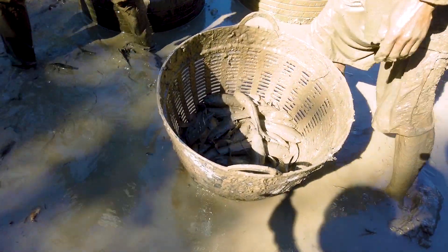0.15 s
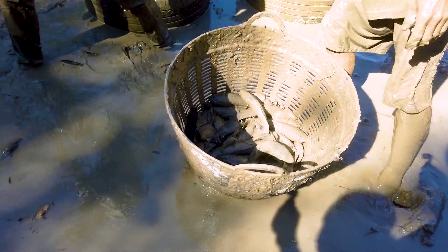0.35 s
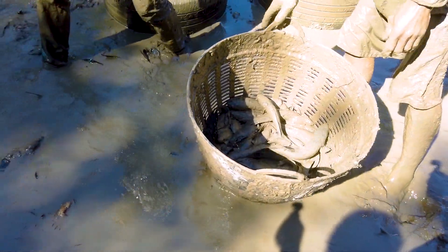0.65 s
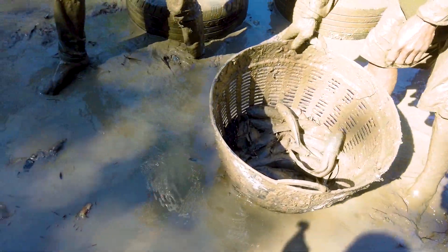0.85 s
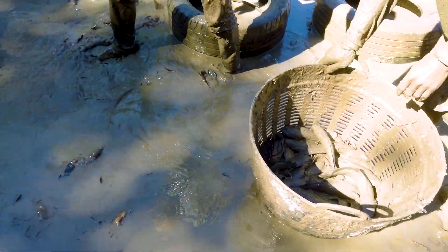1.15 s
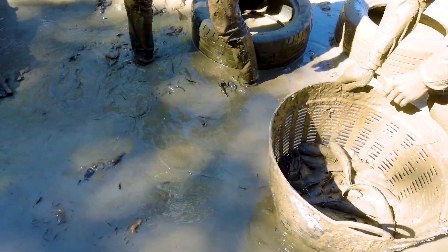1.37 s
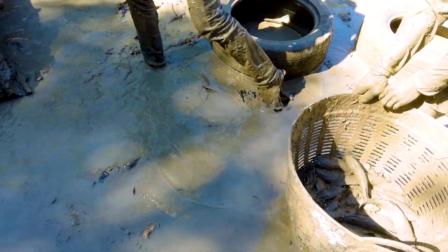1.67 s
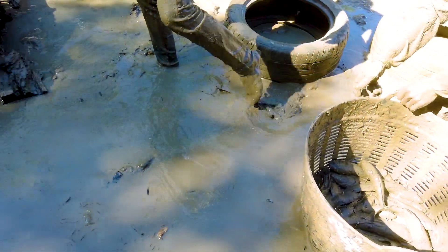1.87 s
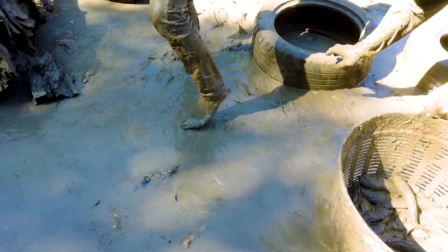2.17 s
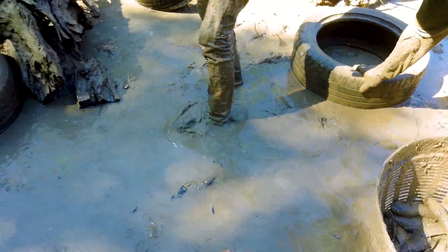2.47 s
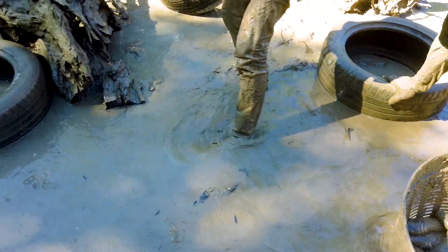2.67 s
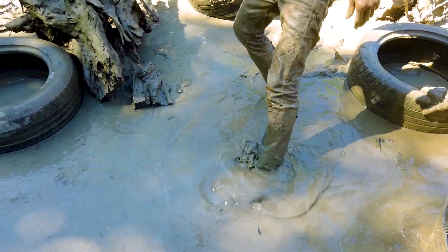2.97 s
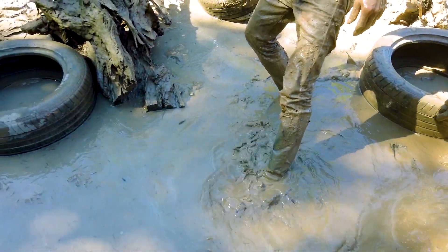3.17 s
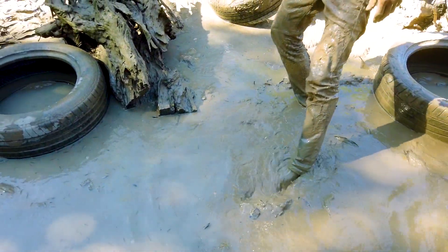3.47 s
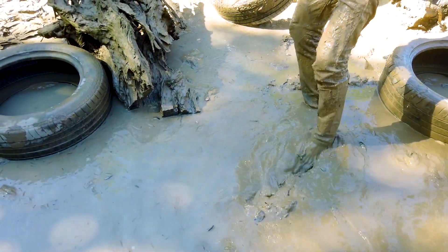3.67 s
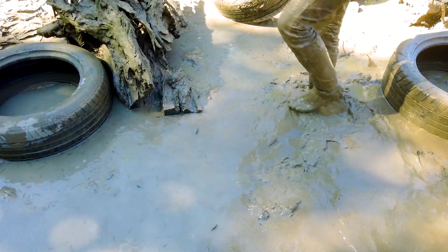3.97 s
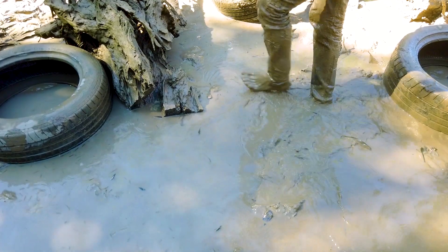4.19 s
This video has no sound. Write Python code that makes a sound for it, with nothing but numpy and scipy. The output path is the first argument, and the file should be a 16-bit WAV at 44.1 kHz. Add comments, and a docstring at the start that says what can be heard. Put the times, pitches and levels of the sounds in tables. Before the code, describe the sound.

Feet wade through wet mud and shallow water, squelching and sloshing with bubbly pops, while wind bumps the microphone.

```python
"""Bare feet wade through the soft mud and shallow water of a drained pond, a couple of metres away.
First a foot stirs the water, which churns and fizzes with bubbles, while a gust rumbles on the microphone.
From about 1 s the feet sink and pull free: air pockets pop, hollows gurgle and films of wet mud smack.
After a lull near 2 s the wading picks up, wind thumps the microphone around 3 s, and a last flurry of
pops comes near 4 s. All along, the banks scatter a short echo."""
import sys
import numpy as np
from scipy import signal
from scipy.fft import rfft, irfft, next_fast_len
from scipy.io import wavfile

SR = 44100
rng = np.random.default_rng(int(sys.argv[2]) if len(sys.argv) > 2 else 0)


def output_pcm(signal):
    """Save a mono or channel-first signal as 16-bit PCM at the path in sys.argv[1].

    Samples are clipped to [-1, 1] before scaling.
    """
    pcm = np.clip(np.atleast_2d(signal).T, -1, 1) * 32767
    wavfile.write(sys.argv[1], SR, np.round(pcm).astype(np.int16))


N = 190953
TIME = np.arange(N) / SR

# the tone of fine spray: f/Hz, level/dB
SPRAY_COLOUR = [(2000, 4), (3500, 5), (5300, -1), (6300, -3), (7300, -8), (7950, -4), (8450, -0.5),
                (9300, -7.5), (10700, 4), (12500, -5.5), (15500, -44)]


def undb(db):
    """Turn decibels into a factor to multiply by."""
    return 10 ** (np.asarray(db) / 20)


def unit(x):
    """Scale a sound to an average strength (rms) of 1."""
    return x / np.sqrt(np.mean(x ** 2) + 1e-20)


def fade(t, t60):
    """Die away by 60 dB every t60 seconds."""
    return np.exp(-np.log(1000) * t / t60)


def envelope(s, length, attack_s, release_s):
    """Swell up to the time s, hold for a length, then die away."""
    swell = np.clip(1 + (TIME - s) / attack_s, 0, 1) ** 2
    return swell * np.exp(-np.maximum(TIME - s - length, 0) / release_s)


def wander(rate):
    """Drift to a new random value, roughly within -1 to 1, rate times a second."""
    return np.interp(TIME * rate, np.arange(2000), rng.standard_normal(2000))


def add(track, s, sound):
    """Mix a sound into a track at s seconds."""
    start = int(np.clip(s * SR, 0, N - 1))
    track[start:start + len(sound)] += sound[:N - start]


def filtered(x, response):
    """Multiply each frequency f in a sound by response(f)."""
    size = next_fast_len(x.shape[-1] + 2048)
    spectrum = rfft(x, size) * response(np.fft.rfftfreq(size, 1 / SR))
    return irfft(spectrum, size)[..., :x.shape[-1]]


def colour(x, points):
    """Shape the tone of a sound by (f/Hz, level/dB) points, at strength 1."""
    hz, db = np.transpose(points)
    return unit(filtered(x, lambda f: undb(np.interp(np.log(f + 1), np.log(hz), db))))


def resonance(x, hz, width):
    """Keep a band around hz, at strength 1; width is a share of hz."""
    return unit(filtered(x, lambda f: (1 + 1j * (f / hz - hz / (f + 1)) / width) ** -2))


def bubble(hz, t60, rise, swell=0.025):
    """A pocket of air rings; its pitch climbs as it shrinks and nears the surface."""
    t = np.arange(int(t60 * SR) + 2) / SR
    loudness = fade(t, t60) * (1 - np.exp(-t / (swell * t60))) ** 2
    return loudness * np.sin(2 * np.pi * hz * t * (1 + rise * t / t60 / 2))


def bubble_cloud(count, low_hz, high_hz, cycles, spread_db, rise):
    """Many bubbles of random size and strength; small ones ring higher and shorter."""
    out = np.zeros(N)
    for when, size, strength, life, climb in rng.random((count, 5)):
        hz = low_hz * (high_hz / low_hz) ** size
        t60 = cycles * 3 ** (life - .5) / hz
        gain = undb(spread_db * min(-np.log(1 - strength), 4))
        add(out, when * N / SR, gain * bubble(hz, t60, rise * (2 * climb - .5)))
    return unit(out)


def wind(shared=0.71):
    """Gusts push on the microphone's two openings (ports), partly together and partly each alone."""
    # gusts of wind: t/s, length/s, rumble/dB, fast swirls/dB
    gusts = [(0.0, 0.16, -44, -57), (0.384, 0.017, -36, -48), (0.639, .12, -45, -65.5),
             (0.975, 0.22, -38.5, -52.5), (1.24, 0.38, -47, -76), (1.769, 0.039, -38, -59),
             (1.978, 0.03, -43.5, -74), (2.637, 0.052, -47, -67), (2.833, 0.36, -37.5, -54.5),
             (3.251, 0.053, -38.5, -65), (3.35, 0.39, -37, -53.5), (3.75, 0.24, -44.5, -82)]
    # the air between gusts: rumble/dB, fast swirls/dB
    calm_db = [-58.5, -69]
    # the tone of the deep rumble: f/Hz, level/dB
    rumble_colour = [(10, -17), (25, 3), (42, 1), (75, -4.5), (120, -20), (220, -35), (500, -100)]
    # the tone of the fast swirls: f/Hz, level/dB
    swirl_colour = [(50, 1.5), (110, 3.5), (170, -7), (260, -13), (500, -92), (1500, -42.5)]
    power = undb(calm_db)[:, None] ** 2
    for s, length, *db in gusts:
        power = power + np.outer(undb(db), envelope(s, length, attack_s=0.028, release_s=0.051)) ** 2
    rumble_gain, swirl_gain = np.sqrt(power)
    rumble, swirls = (colour(rng.standard_normal((2, N)) + shared * rng.standard_normal(N), tone)
                      for tone in (rumble_colour, swirl_colour))
    return rumble_gain * rumble + swirl_gain * swirls


def wind_thumps(cycles=2.04, uneven_db=3):
    """A swirl of air shoves each port for a few cycles, never quite alike."""
    # hard hits of wind, varied for each port: t/s, level near the top of its range/dB, f/Hz
    thumps = [(1.02, -23.5, 97.5), (1.089, -22, 79.5), (1.518, -25.5, 71.7), (2.842, -27.5, 97),
              (2.883, -30.5, 58.4), (3.099, -20.5, 51.8), (3.391, -19, 68.5), (3.463, -31.5, 70),
              (3.52, -22, 66.8), (3.611, -21.5, 57)]
    out = np.zeros((2, N))
    for s, db, hz in thumps:
        for port, (size, stretch) in zip(out, rng.standard_normal((2, 2))):
            samples = int(cycles * SR / hz * 1.42 ** stretch)
            turns = np.arange(samples) * hz / SR / 1.16 ** stretch
            gain = undb(db + uneven_db * (size - 2))
            add(port, s, gain * np.sin(2 * np.pi * turns) * np.hanning(samples))
    return out


def bank_echo(x, near_db=-10, near_t60=0.054, far_db=-21, far_t60=0.81):
    """Water, legs and tyres scatter the sound at once, the banks later."""
    t = np.arange(SR // 2) / SR
    near, far = (unit(rng.standard_normal((2, len(t))) * fade(t, t60) * (t > .002))
                 for t60 in (near_t60, far_t60))
    mid, side = (undb(near_db) * near + undb(far_db) * far) / np.sqrt(len(t))
    # left and right are least alike in the treble
    side = filtered(side, lambda f: np.interp(f, [0, 1500, 4000, 9000], [0.54, 0.3, 0.61, 2.1]))
    return np.array([signal.fftconvolve(x, echo)[:N] for echo in (mid + side, mid - side)])


def ports(x):
    """Sound bends round the microphone's body and reaches the left port a little late."""
    # how far the right port is ahead of the left: f/Hz, phase/rad
    right_lead = [(0, 0), (1000, .3), (2700, .8), (3400, 2.6), (4500, 4.2), (6200, 6.0), (16000, 6.3)]
    hz, radians = np.transpose(right_lead)
    return np.array([filtered(x, lambda f: np.exp(share * 1j * np.interp(f, hz, radians)))
                     for share in (-.5, .5)])


def stirring():
    """Each shove stirs the water and leaves a fading wake; gives churn, slosh and spray levels in dB."""
    # a foot or shin pushes through the pond: t/s, length/s, churn/dB, slosh/dB, spray/dB
    shoves = [(0.0, 0.057, -48, -50.5, -52), (0.117, 0.027, -51, -52, -50.5),
              (0.228, 0.014, -58.5, -65, -56), (0.513, 0.088, -58, -72, -88),
              (0.78, 0.09, -64.5, -58, -67.5), (1.05, 0.064, -50.5, -59.5, -56),
              (1.136, 0.082, -43.5, -49, -48), (1.332, 0.035, -48, -74, -51),
              (1.444, 0.026, -46.5, -55, -59.5), (1.6, 0.11, -62.5, -56, -54),
              (1.694, 0.14, -54, -54.5, -55.5), (1.818, 0.026, -46.5, -64, -46.5),
              (1.894, 0.16, -49.5, -74, -60.5), (2.045, 0.072, -63, -50, -65),
              (2.192, 0.034, -51.5, -66, -57), (2.42, 0.01, -45.5, -55, -49.5),
              (2.548, 0.12, -57.5, -68, -60.5), (2.859, 0.023, -47, -50.5, -52),
              (3.051, 0.2, -51, -59.5, -69.5), (3.274, 0.049, -62, -67, -46.5),
              (3.389, 0.062, -58, -65, -80), (3.529, 0.051, -52.5, -64, -59.5),
              (3.779, 0.34, -52, -63, -57), (3.865, .12, -42.5, -81, -54), (4.181, 0.11, -54, -89, -58.5)]
    # how churn, slosh and spray (a row each) swell and settle:
    # attack/s, release/s, wake/dB, wake release/s, still water/dB
    settling = [(.012, 0.019, -8.5, 0.32, -67), (.025, 0.026, -9, 0.16, -66), (.03, 0.042, -5, .12, -69)]
    levels = []
    for layer, (attack_s, release_s, wake_db, wake_s, still_db) in enumerate(settling):
        power = undb(still_db) ** 2
        for s, length, *db in shoves:
            push = envelope(s, length, attack_s, release_s)
            wake = undb(wake_db) * envelope(s, length, attack_s, wake_s)
            power = power + (undb(db[layer]) * np.maximum(push, wake)) ** 2
        levels.append(10 * np.log10(power))
    return levels


def swishes():
    """A thin sheet of water slides off a leg with a soft, bright swell."""
    # sliding sheets: t/s, length/s (cut to 1/3 s at most), centre f/Hz, level/dB
    sheets = [(0.95, 0.49, 7450, -58.5), (1.36, 0.15, 9500, -60), (1.523, 0.3, 7800, -59),
              (3.252, .11, 11000, -54), (3.773, 0.045, 10100, -57)]
    out = np.zeros(N)
    for s, length, hz, db in sheets:
        hiss = resonance(rng.standard_normal(SR // 3), hz, width=0.58)[:int(length * SR)]
        add(out, s, undb(db) * hiss * np.sin(np.linspace(0, np.pi, len(hiss))))
    return out


def spray(spray_db, crackle_db=-6, hiss_db=-3, patchy_db=6.5, flicker_db=2):
    """Tiny bubbles crackle in the wet mud; their hiss comes from all around and keeps changing tone."""
    tiny = bubble_cloud(count=2500, low_hz=3350, high_hz=14080, cycles=33, spread_db=0, rise=0.026)
    crackle = colour(tiny, SPRAY_COLOUR)
    bands = np.zeros((2, N))
    for hz in np.geomspace(3000, 14500, num=10):
        band = resonance(rng.standard_normal((2, N)), hz, width=0.51)
        bands += band * undb(patchy_db * wander(22) + flicker_db * wander(160))
    hiss = colour(bands, SPRAY_COLOUR)
    return undb(spray_db + crackle_db) * crackle, undb(spray_db + hiss_db) * hiss


def slosh(slosh_db, gain_db=-6):
    """Water shoved aside by the shins glugs with big, low bubbles."""
    # the tone of the deep wash: f/Hz, level/dB
    wash_colour = [(100, -3), (280, -0.5), (430, -4.5), (800, 1.5), (1100, -2.5), (2000, -24.5)]
    glugs = bubble_cloud(count=600, low_hz=314.5, high_hz=1023, cycles=13.2, spread_db=5.5, rise=0.29)
    wash = colour(rng.standard_normal(N), wash_colour)
    return undb(slosh_db + gain_db) * (glugs + wash)


def churn(churn_db, gain_db=-1):
    """Stirred muddy water: a crowd of small, short-lived bubbles over a weaker, flickering wash."""
    # the tone of churning water: f/Hz, level/dB
    tone = [(400, -31), (750, -16), (1100, -1.5), (2000, 3), (2850, 6.5), (3500, -3.5), (4800, -17),
            (7000, -15)]
    bubbles = bubble_cloud(count=2000, low_hz=750, high_hz=3600, cycles=24, spread_db=3.8, rise=.25)
    wash = rng.standard_normal(N) * undb(2 * wander(180))
    return undb(churn_db + gain_db) * (.82 * colour(bubbles, tone) + .55 * colour(wash, tone))


def small_pockets(churn_db, level_db=-59, at_churn_db=-53, follow=1.2):
    """Lesser air pockets plip at random, louder where the water is stirred."""
    plips = bubble_cloud(count=160, low_hz=1203, high_hz=3060, cycles=39, spread_db=3, rise=0.43)
    return undb(level_db + follow * (churn_db - at_churn_db)) * plips


def slurps(grain_db=2.5):
    """Tiny rips in the mud make the hollow round a foot ring; its pitch glides as water rushes in."""
    # mud sucking at a foot: t/s, length/s, start f/Hz, end f/Hz, level/dB, resonance width/Hz
    gulps = [(0.119, 0.023, 700, 1100, -52.5, 1600), (0.392, 0.062, 152, 252, -48, 27),
             (0.53, 0.026, 2380, 2760, -52, 470), (0.573, 0.027, 1390, 2170, -54.5, 950),
             (1.021, 0.065, 150, 283, -55, 10), (1.085, .05, 110, 238, -47.5, 41),
             (1.133, 0.056, 1560, 2560, -45.5, 2900), (1.336, .028, 1500, 3000, -45, 2400),
             (1.521, .07, 133, 225, -61, 6.3), (1.685, 0.023, 1000, 1270, -42, 180),
             (1.714, 0.04, 840, 1310, -45.5, 1500), (1.755, 0.032, 694, 900, -48, 1200),
             (1.808, 0.062, 770, 920, -46.5, 190), (2.377, 0.049, 950, 1920, -54, 480),
             (2.41, 0.017, 1700, 2160, -45, 710), (2.852, 0.031, 1100, 1210, -45, 240),
             (2.866, 0.039, 104, 162, -42.5, 18), (2.982, 0.1, 430, 440, -61, 2.8),
             (3.065, 0.036, 1430, 1000, -44, 340), (3.126, 0.049, 114, 186, -46, 28),
             (3.132, 0.082, 680, 1420, -50, 160), (3.202, 0.058, 1010, 1480, -52, 57),
             (3.284, 0.09, 2100, 2830, -46.5, 270), (3.776, 0.11, 890, 1050, -54, 150),
             (3.846, 0.029, 2060, 2980, -44, 320), (3.82, .026, 540, 900, -52.5, 58),
             (3.885, 0.041, 800, 1000, -47.5, 33), (4.004, 0.067, 780, 1260, -48.5, 160),
             (4.185, 0.066, 850, 1380, -50.5, 95)]
    out = np.zeros(N)
    for s, length, start_hz, end_hz, db, width_hz in gulps:
        noise, sizes = rng.standard_normal((2, SR // 8))[:, :int(length * SR)]
        rips = noise * undb(grain_db * sizes)
        progress = np.linspace(0, 1, len(noise))
        hz = start_hz * (end_hz / start_hz) ** progress
        glide = np.exp(2j * np.pi * np.cumsum(hz) / SR)
        # the hollow rings along the glide; soft mud swallows everything far from it
        poles = np.exp(-np.pi * np.array([width_hz, width_hz + start_hz / 2]) / SR)
        hollow = signal.lfilter([1], np.poly(poles), rips / glide) * glide
        add(out, s, undb(db) * unit(hollow.real * np.sin(np.pi * np.sqrt(progress))))
    return out


def smacks(gain_db=-3, spatter_db=-15, spatter_t60=0.055, spatter_rise_s=0.0008, snap=2.54):
    """A film of mud stretches and snaps in a short bright burst, then droplets spatter."""
    # snapping films: t/s, relative level/dB, centre f/Hz, time scale/s, width as a share of the centre
    films = [(0.020, -35, 5170, 0.023, 0.11), (0.12, -38.5, 4900, .05, .4),
             (0.761, -49.5, 10800, 0.15, 0.49), (1.1434, -21, 7250, .014, 0.14),
             (1.1637, -25.5, 5260, 0.031, 0.079), (1.192, -30.5, 9550, 0.026, 0.78),
             (1.342, -30, 5330, 0.019, 0.11), (1.353, -27.5, 5000, .011, 0.085),
             (1.453, -38, 5500, 0.024, 0.18), (1.7878, -25, 8400, 0.026, 0.043),
             (1.7874, -27.5, 7100, 0.017, 0.33), (2.222, -46, 5200, 0.14, 0.28),
             (2.424, -46, 7500, 0.043, 0.057), (2.538, -45.5, 5640, 0.067, 0.13),
             (2.6064, -29.5, 9200, 0.025, 0.22), (2.852, -34.5, 5300, 0.027, .31),
             (2.9702, -34, 7100, 0.046, 1), (2.9716, -25, 7800, 0.035, 0.23),
             (3.307, -22, 4010, 0.039, 0.11), (3.3492, -30, 5040, 0.015, 0.15),
             (3.721, -29.5, 10100, 0.007, 0.053), (3.898, -43, 4800, .017, 0.48),
             (3.9249, -27, 10160, 0.028, 0.48), (4.245, -39.5, 5220, 0.028, 0.12)]
    out = np.zeros(N)
    t = np.arange(SR // 10) / SR
    shower = fade(t, spatter_t60) * (1 - np.exp(-t / spatter_rise_s))
    for s, db, hz, scale_s, width in films:
        noise, drops, sizes = rng.standard_normal((3, len(t)))
        age = np.log(1000) * t / scale_s
        burst = resonance(noise, hz, width) * age * np.exp(1 - snap * age)
        spatter = colour(drops * undb(5.9 * sizes), SPRAY_COLOUR) * shower
        add(out, s, undb(db) * (burst + undb(spatter_db) * spatter))
    return undb(gain_db) * out


def air_pockets(tear_db=-15, tear_t60=0.01, tear_lead_s=0.0022, typical_t60=0.016):
    """Each pocket rings, with a wet rasp as its mud wall tears; the longer it rings, the less it rasps."""
    # the loudest pockets that burst under the feet: t/s, f/Hz, level/dB, ring time t60/s
    pops = [(0.011, 329, -35.5, 0.043), (0.041, 1690, -34.5, 0.041), (0.048, 2860, -30.5, 0.026),
            (0.123, 2090, -27, 0.012), (0.43, 1180, -34, 0.041), (0.458, 1515, -38.5, 0.022),
            (0.472, 1160, -37.5, 0.037), (0.707, 267, -41.5, 0.11), (0.727, 1640, -36, 0.037),
            (0.773, 277, -33.5, 0.035), (0.791, 558, -46.5, .14), (0.821, 2100, -40.5, 0.038),
            (0.852, 415, -44, .15), (0.883, 2470, -35, 0.014), (1.056, 2750, -34.5, 0.026),
            (1.068, 275, -31, 0.04), (1.067, 2150, -33.5, 0.036), (1.14, 890, -25.5, 0.014),
            (1.144, 423, -32.5, 0.062), (1.18, 1960, -19.5, 0.014), (1.1917, 2800, -15, 0.013),
            (1.216, 1670, -33, 0.07), (1.237, 351, -34.5, 0.065), (1.34, 3150, -30.5, 0.027),
            (1.359, 2060, -24.5, 0.0092), (1.465, 512, -20.5, 0.014), (1.4645, 2220, -30, 0.0083),
            (1.627, 2725, -34, 0.023), (1.647, 703, -29, 0.026), (1.689, 1030, -35, 0.029),
            (1.7154, 817, -18.5, 0.011), (1.82, 1230, -19.5, 0.011), (1.8308, 2450, -20.5, 0.0063),
            (1.876, 1180, -27, 0.013), (1.915, 1800, -32.5, 0.022), (2.188, 2470, -32, 0.015),
            (2.29, 2710, -36, 0.019), (2.428, 2800, -31.5, .055), (2.545, 2690, -30, 0.015),
            (2.584, 2690, -31, 0.014), (2.582, 1006, -39, 0.038), (2.608, 970, -32, .022),
            (2.656, 1140, -37, 0.034), (2.81, 950, -34, 0.014), (2.8505, 635, -23.5, 0.038),
            (2.8503, 1140, -27.5, 0.0066), (2.9725, 1400, -33.5, 0.015), (3.031, 3010, -30, 0.022),
            (3.071, 970, -27.5, 0.013), (3.127, 2227, -26.5, 0.032), (3.167, 1204, -29.5, 0.03),
            (3.22, 1173, -32.5, 0.037), (3.291, 2840, -24.5, 0.024), (3.297, 450, -37.5, 0.054),
            (3.665, 680, -39.5, 0.066), (3.72, 1586, -26.5, 0.03), (3.795, 2290, -26, 0.0081),
            (3.838, 818, -32, 0.037), (3.8409, 2550, -25, 0.011), (3.877, 2890, -28.5, 0.052),
            (3.927, 2094, -15, .015), (3.936, 1110, -23, 0.013), (3.971, 1680, -22, 0.0066),
            (3.991, 1097, -31.5, 0.046), (4.017, 1096, -35, 0.062), (4.07, 384, -35, 0.08),
            (4.182, 2960, -30.5, 0.016), (4.189, 1095, -33, 0.093)]
    # pockets near 1 kHz chirp most: f/Hz, share by which the pitch rises while it rings
    pitch_rise = [(300, 0.33), (650, 0.18), (1100, 0.62), (1700, 0.37), (2800, 0.034)]
    rings, tears = np.zeros(N), np.zeros(N)
    t = np.arange(SR // 10) / SR - .02  # the tear starts just before the pop
    tear_shape = np.exp(np.minimum(t / tear_lead_s, -np.log(1000) * t / tear_t60))
    for s, hz, db, t60 in pops:
        rise = np.interp(hz, *np.transpose(pitch_rise))
        add(rings, s, undb(db) * bubble(hz, t60, rise, swell=0.019))
        add(tears, s + t[0], undb(db) * min(typical_t60 / t60, 1) * tear_shape)
    rasp_colour = [(200, -80), (900, 13.5), (2900, 15.5), (4500, -3), (11000, -28), (16000, -46)]
    rasp = colour(rng.standard_normal(N), rasp_colour)
    return rings + undb(tear_db) * tears * rasp


def scene():
    """Everything the feet stir up, its echo, and the wind, in stereo."""
    churn_db, slosh_db, spray_db = stirring()
    crackle, hiss = spray(spray_db)
    mud = air_pockets() + small_pockets(churn_db) + slurps() + smacks() + crackle
    water = churn(churn_db) + slosh(slosh_db) + swishes()
    wading = mud + water
    return ports(wading) + bank_echo(wading) + hiss + wind() + wind_thumps()


def record(dry):
    """The recorder cuts the highest treble, above 15.5 kHz."""
    return signal.sosfilt(signal.ellip(8, .2, 70, 15500, fs=SR, output="sos"), dry)


dry = scene()
out = record(dry)
output_pcm(out)
```